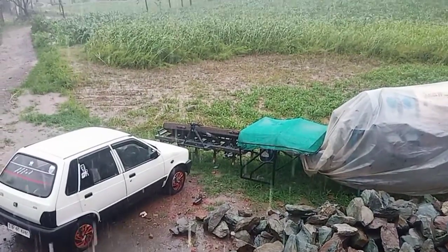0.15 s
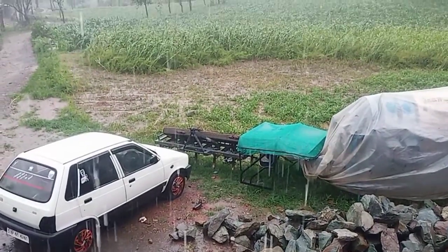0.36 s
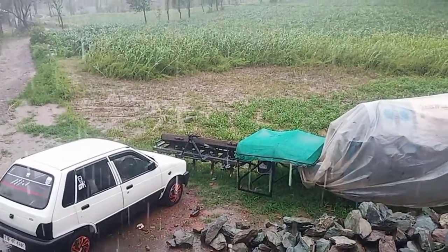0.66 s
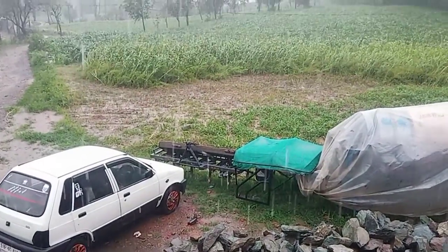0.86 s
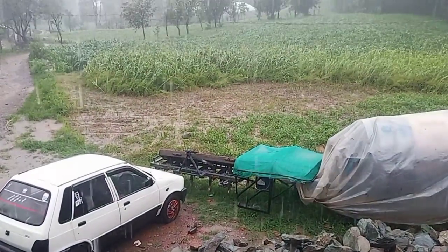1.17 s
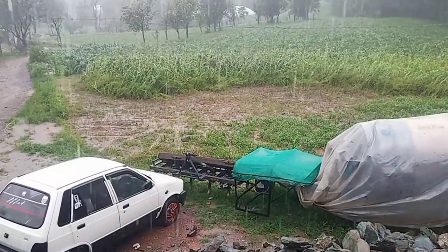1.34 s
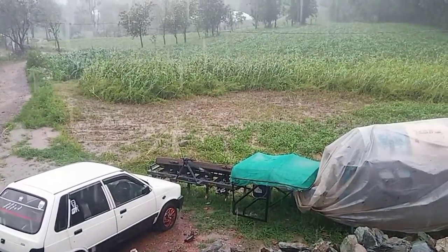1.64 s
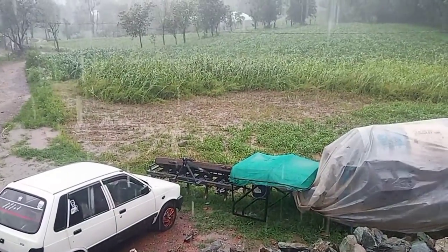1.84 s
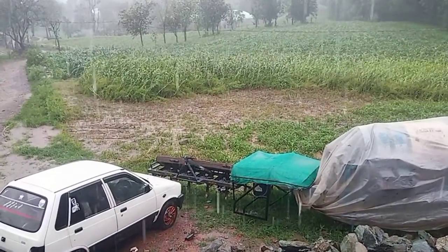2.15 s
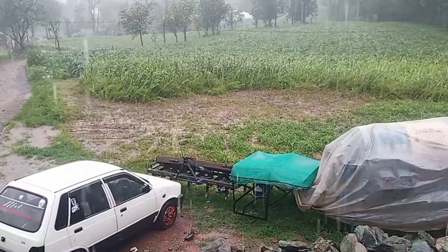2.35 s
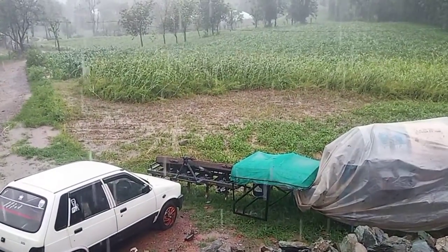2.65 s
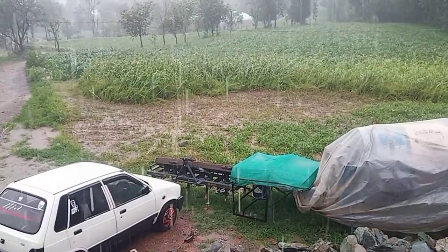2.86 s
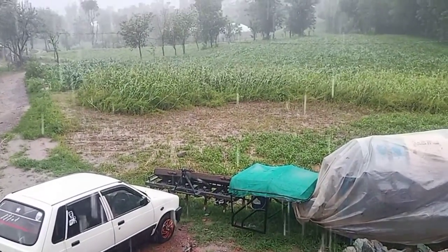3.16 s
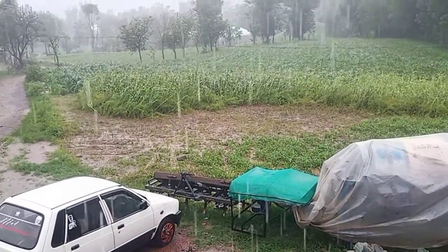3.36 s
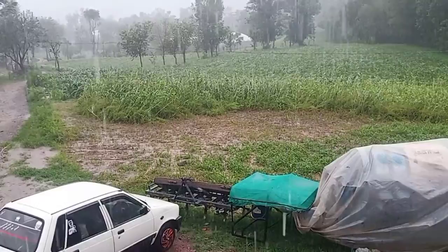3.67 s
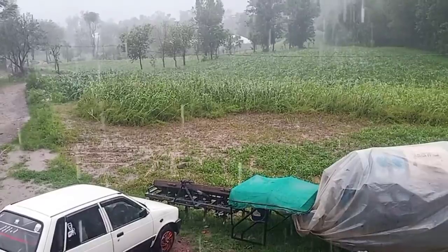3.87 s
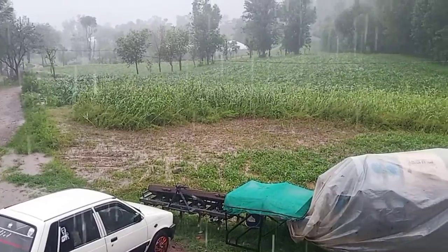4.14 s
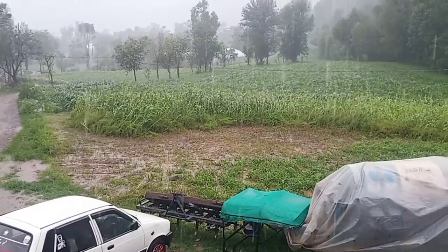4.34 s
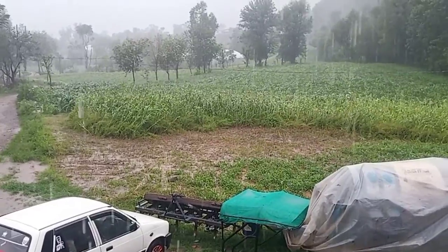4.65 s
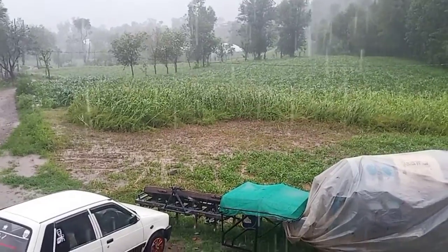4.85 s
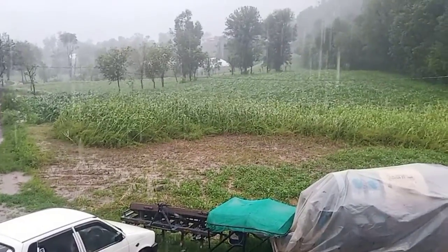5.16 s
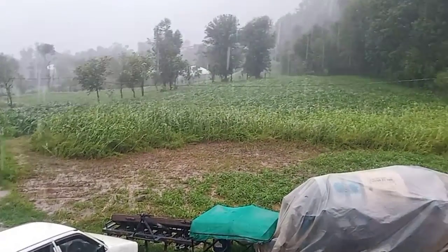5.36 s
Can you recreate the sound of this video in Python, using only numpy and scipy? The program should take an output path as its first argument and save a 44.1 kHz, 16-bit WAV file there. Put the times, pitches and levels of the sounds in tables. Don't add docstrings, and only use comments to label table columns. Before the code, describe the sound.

Heavy rain pours steadily on fields, mud and sheeting, a dense bright hiss with sharp close drops and low wind buffeting the microphone.

```python
import sys
import numpy as np
from scipy import signal
from scipy.fft import rfft, irfft
from scipy.io import wavfile
from scipy.ndimage import uniform_filter1d

SR = 44100
rng = np.random.default_rng(int(sys.argv[2]) if len(sys.argv) > 2 else 0)


def wav_out(sig):
    wavfile.write(sys.argv[1], SR, np.round(np.clip(np.atleast_2d(sig).T, -1, 1) * 32767).astype(np.int16))


def volts(x):
    e = np.asarray(x, float) / 20
    return 10 ** e


N = 242987


def rms_one(x):
    return x / np.sqrt(np.mean(x ** 2) + 1e-20)


def in_time(rows):
    s, level = np.transpose(rows)
    return np.interp(np.arange(N) / SR, s, level)


def above(x, hz):
    return signal.sosfilt(signal.butter(2, hz, "high", fs=SR, output="sos"), x)


def below(x, hz):
    return signal.sosfilt(signal.butter(4, hz, fs=SR, output="sos"), x)


def split(x, hz):
    low = signal.sosfiltfilt(signal.butter(3, hz, fs=SR, output="sos"), x)
    return low, x - low


def colour(x, points):
    size = 8192
    hz, db = np.transpose(points)
    bins_hz = np.arange(size // 2 + 1) * SR / size
    log_gain = np.log(volts(np.interp(np.log(bins_hz + 1), np.log(hz), db)))
    cepstrum = irfft(log_gain)
    cepstrum[1:size // 2] *= 2
    cepstrum[size // 2 + 1:] = 0
    impulse_response = irfft(np.exp(rfft(cepstrum)))
    return signal.fftconvolve(x, impulse_response)[:N]


def drift(rate_hz):
    r = np.exp(-2 * np.pi * rate_hz / SR)
    noise = rng.standard_normal(N + SR)
    settled = signal.lfilter([1], [1, -2 * r, r * r], noise)[SR:]
    return rms_one(settled)


def ring(clicks, hz, t60):
    r, w = volts(-60 / (t60 * SR)), 2 * np.pi * hz / SR
    return signal.lfilter([0, np.sin(w)], [1, -2 * r * np.cos(w), r * r], clicks + 1e-18)


def strikes(per_s, spread_db, clump_db):
    sizes = volts(spread_db * np.minimum(rng.exponential(1, N), 4.2)) * rng.choice([-1, 1], N)
    chance = per_s * volts(clump_db * drift(30)) / SR
    return sizes * (rng.random(N) < chance)


def plinks(per_s, spread_db, cycles, low_hz, high_hz):
    hits = strikes(per_s, spread_db, clump_db=2.5)
    dealt = rng.integers(0, 24, N)
    out = np.zeros(N)
    for k, hz in enumerate(np.geomspace(low_hz, high_hz, 24)):
        out += ring(hits * (dealt == k), hz, cycles / hz) * hz / low_hz
    return rms_one(out)


def splashes(per_s, spread_db, decay_s):
    keep = np.exp(-1 / (decay_s * SR))
    swell = signal.lfilter([1], [1, -keep], np.abs(strikes(per_s, spread_db, clump_db=2.5)))
    return rms_one(swell * rng.standard_normal(N))


def steady(x):
    return x * (np.mean(x ** 2) / uniform_filter1d(x ** 2, SR // 10)) ** .4


# (f/Hz, density level/dB)
RAIN_COLOUR = [(290, -17.5), (550, -10), (730, -12), (1100, -8.5), (1470, -9.5), (2450, -.5), (4200, -1),
               (4850, -4), (6150, 0), (7700, -4), (9000, -11.5), (12300, -16)]
# (f/Hz, density level/dB)
PORT_RESONANCE = [(14300, -11), (15450, -7.5)]


def through_microphone(x):
    return colour(x, RAIN_COLOUR + PORT_RESONANCE)


# (t/s, level over the fall/dB, length/s)
RUNOFF_GOUTS = [(.0, -1.5, 0.023), (0.796, 1, 0.02), (1.23, 3, .035), (1.425, -10, .02), (1.884, -6, 0.017),
                (1.942, 1, 0.026), (2.22, -2, .015), (2.70, -3, 0.033), (3.111, -1, 0.02),
                (3.853, -9, 0.049), (4.076, -5.5, 0.018), (4.194, -7, .04), (4.601, -7, 0.018),
                (4.683, -4, 0.026), (4.973, -12, 0.02)]


def gouts():
    t = np.arange(N) / SR
    swell = np.zeros(N)
    for s, level_db, length_s in RUNOFF_GOUTS:
        age = np.maximum(t - s, 0) / length_s
        swell += volts(level_db + 12.0) * np.sqrt(age) * np.exp(-1.5 * age ** 2)
    return swell * rms_one(strikes(per_s=5000, spread_db=4.0, clump_db=1.5))


GRAIN_CUT_HZ, SPLIT_LOW_HZ, SPLIT_HIGH_HZ = 1700, 4600, 8500
PATTER_FOLLOWS, BODY_FOLLOWS, SPRAY_FOLLOWS = 0.97, 0.85, 0.45
FAR_FADE_DB_PER_S, FAR_PATCHY_DB = -0.41, 0.8
# (t/s, level/dB)
RAINFALL = [(0.0, -22.5), (0.07, -25), (0.71, -24.5), (1.2, -25.5), (1.24, -24.5), (1.29, -25), (2.59, -26),
            (2.64, -29), (2.68, -26), (3.35, -25), (3.82, -27.5), (3.87, -22.5), (3.94, -27.5), (3.96, -24),
            (3.99, -27.5), (4.22, -25), (4.39, -26), (5.51, -26.5)]


def rain():
    fall_db = in_time(RAINFALL)
    swing_db = fall_db - fall_db.mean()
    hiss = rng.standard_normal(N) * volts(.5 * drift(25))
    ticks = rms_one(strikes(per_s=1200, spread_db=2.5, clump_db=1.0))
    leaves = plinks(4500, 2.4, cycles=13.3, low_hz=1488, high_hz=14900)
    puddles = plinks(200, 3.4, cycles=53.0, low_hz=896, high_hz=7650)
    splash = splashes(80, 2.8, decay_s=0.0026)
    grains = volts(-7.5) * ticks + volts(-1) * leaves + volts(-11.0) * splash
    murmur = volts(2.5) * below(rng.standard_normal(N), GRAIN_CUT_HZ)
    fall = hiss + murmur + above(grains, GRAIN_CUT_HZ) + volts(-12.0) * puddles
    far, near = split(through_microphone(fall), GRAIN_CUT_HZ)
    patter, near = split(near, SPLIT_LOW_HZ)
    body, spray = split(near, SPLIT_HIGH_HZ)
    far_db = FAR_FADE_DB_PER_S * (np.arange(N) - N / 2) / SR + FAR_PATCHY_DB * drift(5)
    out = volts(far_db) * steady(far)
    out += volts(PATTER_FOLLOWS * swing_db) * steady(patter)
    out += volts(BODY_FOLLOWS * swing_db) * steady(body)
    out += volts(SPRAY_FOLLOWS * swing_db) * steady(spray)
    slaps = through_microphone(above(gouts(), GRAIN_CUT_HZ))
    return volts(-25.0) * (out + slaps) / np.std(out)


BREEZE_LIFT_DB, PUFF_RISE_SHARE = 0.5, 0.74
# (t/s, level/dB)
BREEZE_LEVEL = [(0.0, -34.5), (0.31, -35.5), (1.47, -33.5), (1.61, -46), (1.84, -36), (1.95, -37.5),
                (2.03, -36), (2.76, -41), (3.04, -38.5), (3.57, -38.5), (3.91, -36.5), (4.17, -32),
                (4.48, -35), (5.51, -29.5)]
# (t/s, peak level/dB, length/s)
WIND_PUFFS = [(0.203, -37, 0.048), (.29, -34, 0.04), (0.47, -28, 0.026), (0.63, -36.5, 0.093),
              (0.768, -28, 0.029), (.88, -34, 0.024), (1.012, -32, 0.039), (1.18, -24, 0.026),
              (1.328, -28, 0.034), (1.478, -33, 0.046), (1.587, -25.5, 0.042), (1.828, -26.5, 0.027),
              (1.945, -25, .025), (2.07, -33.5, 0.047), (2.277, -33, .045), (2.537, -35, 0.068),
              (2.81, -34.5, 0.032), (2.962, -30.5, 0.046), (3.32, -32.5, 0.055), (3.65, -36.5, 0.13),
              (3.98, -35, .03), (4.083, -34, 0.025), (4.29, -37, 0.13), (4.53, -32.5, .02), (4.6, -34, .02),
              (4.82, -31.5, 0.047), (4.982, -32, 0.044), (5.106, -28.5, 0.022), (5.206, -33, 0.017),
              (5.355, -28.5, 0.062)]


def wind_db():
    t = np.arange(N) / SR
    power = volts(2 * (in_time(BREEZE_LEVEL) + BREEZE_LIFT_DB))
    for s, peak_db, length_s in WIND_PUFFS:
        width = length_s * np.where(t < s, PUFF_RISE_SHARE, 1)
        power = power + volts(2 * peak_db) * np.exp(-((t - s) / width) ** 2)
    return 10 * np.log10(power)


def evened(x, span_s):
    return rms_one(x / (uniform_filter1d(x ** 2, int(span_s * SR)) + 1e-12) ** 0.21)


EDGE_HZ, EDGE_DB, EDGE_FOLLOWS = 170, -4.5, .3
# (f/Hz, density level/dB)
WIND_COLOUR = [(15, -60), (25, -29.5), (66, -7), (113, -3.5), (211, 1.5), (283, -5.5), (354, -10),
               (700, -25.5), (910, -67), (1540, -120)]


def wind():
    rumble_db = wind_db()
    edge_db = EDGE_DB + EDGE_FOLLOWS * (rumble_db - rumble_db.mean())
    air = colour(rng.standard_normal(N), WIND_COLOUR)
    low = below(air, EDGE_HZ)
    edge = evened(air - low, 0.0405) * volts(2.4 * drift(36))
    return volts(rumble_db + 3.5) * (evened(low, 0.049) + volts(edge_db - 1.0) * edge)


SPATTER_DB = -23
# (t/s, peak level/dB, f/Hz)
DULL_DROPS = [(0.0375, -18, 2540), (0.1344, -10, 4180), (0.737, -9, 2960), (0.7956, -9, 4570),
              (0.941, -15, 2950), (1.2266, -11, 2940), (1.35, -12, 4540), (1.436, -11.5, 2500),
              (1.6815, -18, 2760), (1.733, -17, 4170), (2.4289, -9, 4270), (2.7166, -10.5, 3000),
              (2.7896, -11, 2860), (2.7968, -9, 3570), (2.98, -10, 3570), (3.0582, -17, 2500),
              (3.1161, -12, 2940), (3.2422, -13, 2760), (3.4317, -17, 3610), (3.5723, -26, 2490),
              (3.681, -14, 3450), (3.9598, -10, 3000), (4.27, -10, 4000), (4.3244, -9.5, 2750),
              (4.591, -11, 3030), (4.8466, -11.5, 3230), (4.932, -10, 3640), (4.9903, -10, 2980),
              (5.2126, -14, 2500), (5.362, -15, 2960)]
# (t/s, peak level/dB, f/Hz)
BRIGHT_DROPS = [(0.074, -8, 6580), (0.189, -6.5, 6660), (0.2438, -5.5, 7160), (0.3024, -6, 6100),
                (0.3703, -7, 5730), (0.5038, -10, 5800), (1.0993, -7, 6050), (1.371, -8, 6370),
                (1.5316, -9.5, 7000), (1.6162, -5, 5960), (1.675, -12, 5800), (1.703, -9, 7040),
                (2.2233, -8.5, 6670), (2.4755, -9, 6630), (2.8379, -11, 6180), (2.9156, -8, 6660),
                (3.016, -6.5, 6100), (3.325, -10, 6900), (3.6511, -15, 5710), (3.681, -7, 5740),
                (3.853, -11, 5100), (4.23, -7, 5340), (4.675, -8, 7280), (4.6823, -5, 5910),
                (4.7359, -8, 6040), (4.79, -12, 5880), (5.0599, -9, 6400), (5.093, -8, 7350),
                (0.9945, -18, 5820), (5.247, -15, 6000)]


def close_drops():
    out = np.zeros(N + 1024)
    t = np.arange(1024) / SR
    for s, peak_db, hz in DULL_DROPS + BRIGHT_DROPS:
        noise = rng.standard_normal(1024)
        tone = np.sin(2 * np.pi * hz * t) * np.exp(-t * hz / 3.0)
        spatter = np.convolve(noise * np.exp(-t / 0.011), tone[:32])[:len(t)]
        at = round((s + 0.00103) * SR)
        out[at:at + len(t)] += volts(peak_db - 4) * (tone + volts(SPATTER_DB) * spatter)
    return out[:N]


# (t/s, peak level/dB, f/Hz)
HARD_BUFFETS = [(0.059, -26, 248), (0.153, -28, 171), (0.216, -26, 213), (0.267, -20, 113),
                (0.445, -19.5, 216), (0.568, -27, 162), (1.95, -21.5, 170), (2.285, -22, 120),
                (1.172, -18, 150), (1.314, -18.5, 102.3), (1.473, -20, 167), (1.559, -17, 124),
                (1.594, -15, 196), (1.76, -25, 199), (1.809, -20, 174), (1.91, -16, 171),
                (2.029, -22.5, 140), (2.099, -26, 210), (2.245, -23, 160), (3.209, -26, 153),
                (2.945, -22, 130), (4.376, -22, 130), (4.802, -17.5, 129), (4.973, -21, 105),
                (5.006, -27, 102), (5.08, -17, 105), (5.207, -27, 186), (5.281, -14.5, 120),
                (5.333, -19, 127), (5.384, -14, 150)]


def buffets():
    out = np.zeros(N)
    for s, peak_db, hz in HARD_BUFFETS:
        push = np.zeros(N)
        push[round((s + .004) * SR)] = -volts(peak_db + 3.5)
        out += below(ring(push, hz, 6.7 / hz), 700)
    return out


# (t/s, peak level/dB)
SPRAY_CRACKS = [(0.075, -11), (0.3681, -18), (0.3925, -21), (0.5541, -27), (0.8754, -26.5), (0.9577, -21),
                (1.7035, -21), (1.7384, -21), (1.822, -19), (2.1989, -20), (2.2792, -32), (2.5835, -18),
                (2.82, -15), (2.8389, -20), (3.0155, -14), (3.4411, -18), (3.464, -15), (3.9624, -11),
                (4.0657, -16.5), (4.3241, -17), (4.3515, -16), (4.563, -9), (4.6778, -18), (4.8903, -14),
                (4.924, -11.5), (4.9856, -20), (5.2021, -21), (5.3213, -15), (5.3477, -15.5), (5.4605, -30)]


def spray_cracks():
    out = np.zeros(N + 1024)
    t = np.arange(1024) / SR
    for s, peak_db in SPRAY_CRACKS:
        burst = rng.standard_normal(1024) * np.exp(-t / 0.0013)
        at = round((s + 0.00058) * SR)
        out[at:at + len(t)] += volts(peak_db - 12.5) * np.diff(burst, 2, prepend=[0, 0])
    return out[:N]


# (t/s, level/dB, start f/Hz, decay/s)
PUDDLE_BUBBLES = [(.612, -20, 2800, .012), (.735, -29, 2860, .012), (1.227, -28, 2920, .01),
                  (1.675, -17, 2800, 0.013), (3.57, -21, 2380, .012), (3.961, -23, 2710, .01),
                  (4.181, -17, 2310, 0.024), (4.595, -17, 2680, 0.013), (4.684, -22, 2770, 0.011),
                  (4.99, -17, 2890, 0.013), (5.362, -19, 2870, .01)]


def bubbles():
    out, t = np.zeros(N), np.arange(N) / SR
    for s, level_db, hz, decay_s in PUDDLE_BUBBLES:
        age = np.clip(t - s, 0, .1)
        phase = 2 * np.pi * hz * age * (1 + 2.5 * age)
        out += volts(level_db - 7) * np.sin(phase) * np.exp(-age / decay_s) * (age < .1)
    return out


SLIP_S, SLIP_LENGTH_S, SLIP_BAND_HZ = 1.639, .0464, (4600, 7000)


def channel_slip():
    band = signal.butter(6, SLIP_BAND_HZ, "band", fs=SR, output="sos")
    part = np.clip((np.arange(N) / SR - SLIP_S) / SLIP_LENGTH_S, 0, 1)
    noise = rms_one(signal.sosfilt(band, rng.standard_normal(N)))
    side = volts(-30) * noise * np.sin(np.pi * part) ** 2
    return side * [[1], [-1]]


def scene():
    mono = rain() + wind() + close_drops() + buffets() + spray_cracks() + bubbles()
    return np.tile(mono, (2, 1))


def band_limit(x):
    return signal.sosfilt(signal.butter(12, 16780, fs=SR, output="sos"), x)


BASS_CUT_HZ, TOP_CUT_HZ = 55, 15470


def record(dry):
    top_cut = signal.ellip(14, .5, 60, TOP_CUT_HZ, fs=SR, output="sos")
    mix = signal.sosfilt(top_cut, above(dry, BASS_CUT_HZ)) + channel_slip()
    return band_limit(mix)


dry = scene()
out = record(dry)
wav_out(out)
```